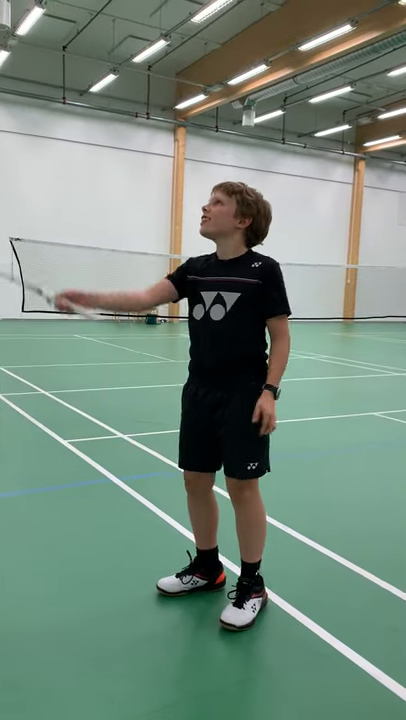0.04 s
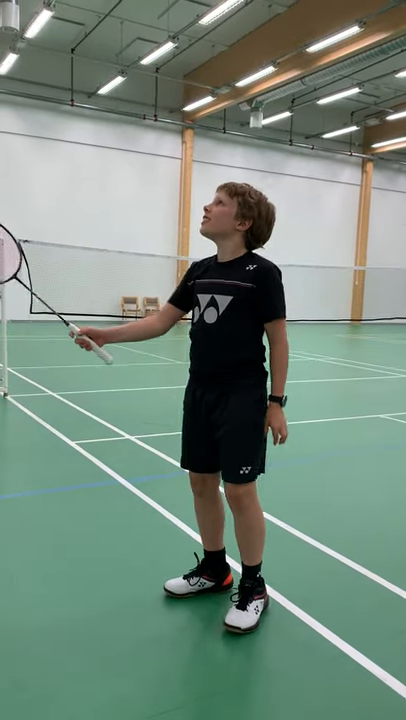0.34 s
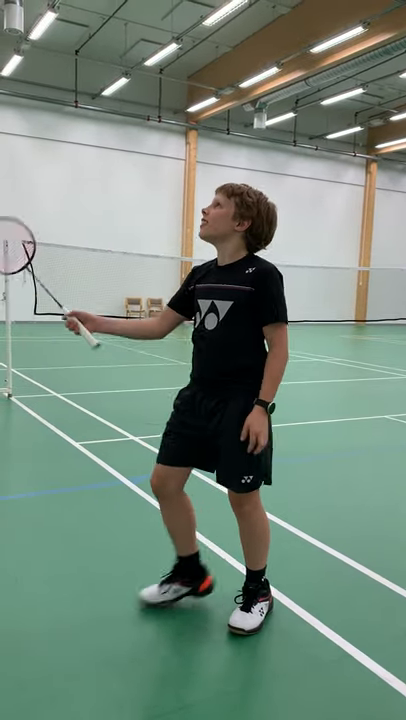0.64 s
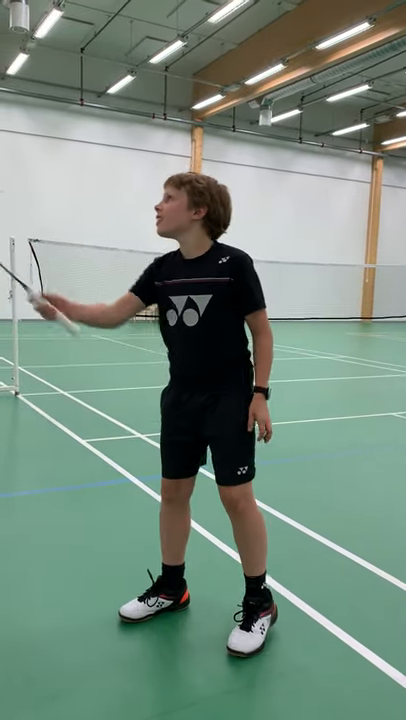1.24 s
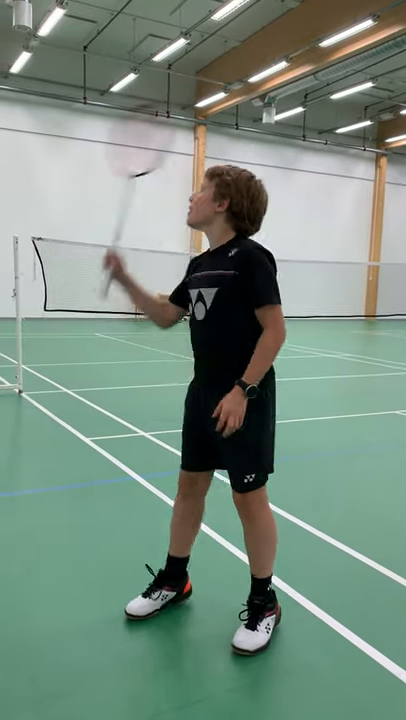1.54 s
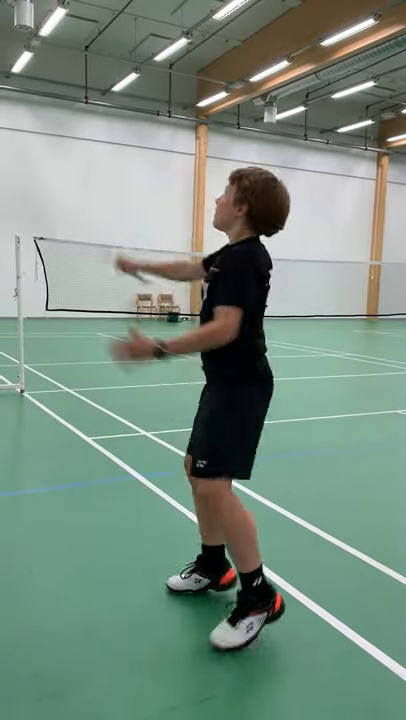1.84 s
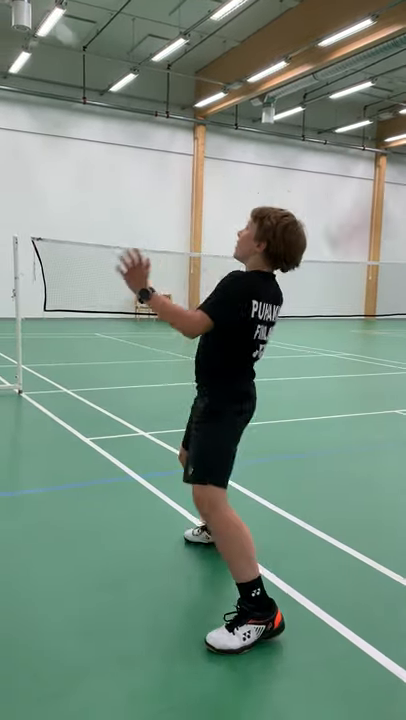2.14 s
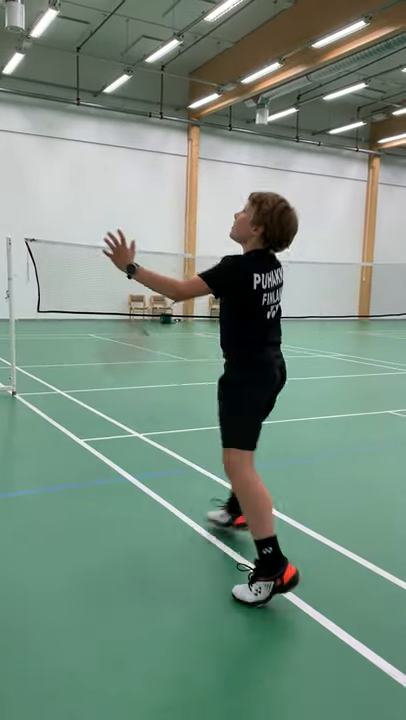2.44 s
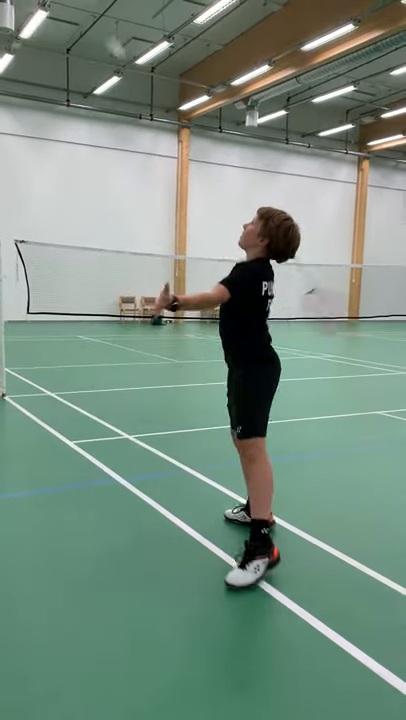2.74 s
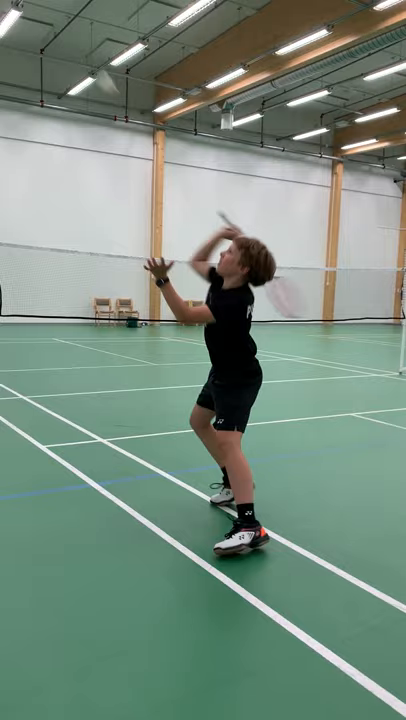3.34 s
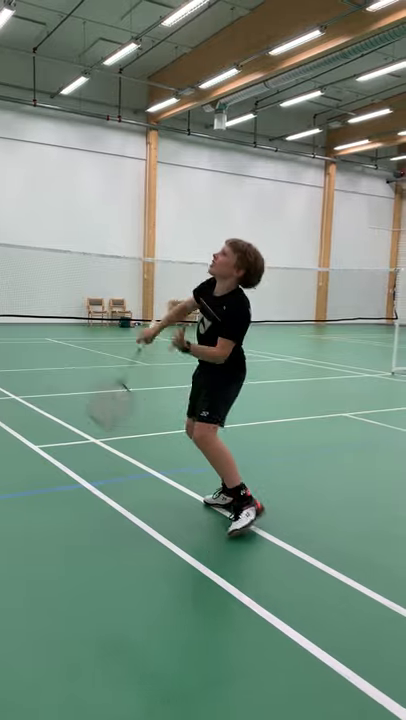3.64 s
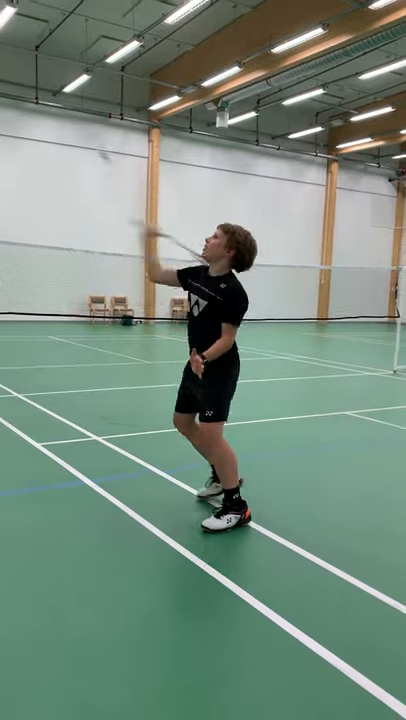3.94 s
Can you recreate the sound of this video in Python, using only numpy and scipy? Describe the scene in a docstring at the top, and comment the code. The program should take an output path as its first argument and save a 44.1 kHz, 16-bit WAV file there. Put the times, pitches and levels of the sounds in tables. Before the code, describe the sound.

Badminton racket hits a shuttlecock against a wall five times in an echoing hall.

```python
"""Large sports hall: a player drives a shuttlecock against the wall.
Each stroke cracks and rings the strings; about 0.1 s later the cork knocks on the wall panel.
Shoes scuff and thud, swings swish, the racket frame rings at the start, ventilation runs underneath.
The hall reverberates into a microphone pair; a compressor ducks after the hardest knocks."""
import sys
import numpy as np
from scipy import signal
from scipy.fft import rfft, irfft, next_fast_len
from scipy.io import wavfile
from scipy.ndimage import uniform_filter1d

SR = 44100
rng = np.random.default_rng(int(sys.argv[2]) if len(sys.argv) > 2 else 0)


def dump_mix(stems):
    """Bounce the given channels to the path in sys.argv[1] as a 16-bit WAV at rate SR."""
    frames = np.atleast_2d(stems).T  # one column per channel
    limited = np.clip(frames, -1, 1)  # hard clip at full scale
    pcm = np.round(limited * 32767).astype(np.int16)
    wavfile.write(sys.argv[1], SR, pcm)


N = 176400
T = np.arange(SR // 2) / SR  # time axis of one event, s
MID_S = T[-1] / 2

# racket strokes: start_s, crack_db, crack_hold_s, body_db, ring_db, ring_t60_s, lowest_mode_hz,
# overtones_db, thump_hz, thump_db
STROKES = [(1.133, -24, 0.0038, -34.5, -31, 0.13, 1100, 6, 325, -23.5),
           (1.8955, -6.5, 0.0028, -22.5, -22, 0.088, 1130, 4.5, 680, -13.5),
           (2.3928, -10, 0.0023, -17, -12.5, 0.055, 1105, -0.5, 400, -16.5),
           (2.942, -14, 0.0084, -18, -22, 0.042, 1079, 1.5, 1680, -19),
           (3.5162, -15.5, 0.0027, -23, -20.5, 0.048, 1092, 3, 446, -20.5)]
# spectrum of wall boom and footfalls: freq_hz, level_db
THUD_SPECTRUM = [(25, -43), (45, -18), (70, 11.5), (120, 4.5), (300, 3), (700, 1.5), (3000, -38)]


def racket():
    """Feathers crackle on the strings, the cork thumps, the skirt flutters as it leaves."""
    # spectra: freq_hz, level_db
    crack_spectrum = [(300, -40.5), (1500, -1.5), (2800, 1), (4000, 2.5), (5500, 3), (9000, 1), (12000, -1),
                      (14500, -5), (16000, 4)]
    sizzle_spectrum = [(1500, -1), (4000, -6), (6500, 3.5), (9000, -20), (12000, -4), (16000, -11)]
    body_spectrum = [(40, -7), (140, 3.5), (300, 7), (480, 4), (700, 9), (950, -8), (1650, 6), (2600, -60),
                     (6000, -43)]
    out = np.zeros(N)
    for start_s, crack_db, hold_s, body_db, *_, thump_hz, thump_db in STROKES:
        crack = crackling(blow(rise_s=0.00096, hold_s=hold_s, fall_s=0.0085), depth_db=2.5, rate_hz=680)
        add(out, start_s, amp(crack_db) * burst(crack, crack_spectrum))
        sizzle = crackling(blow(rise_s=0.004, hold_s=0.02, fall_s=0.019), depth_db=3, rate_hz=470)
        add(out, start_s, amp(crack_db - 17) * burst(sizzle, sizzle_spectrum))
        body = blow(rise_s=0.00063, hold_s=0.00725, fall_s=0.0084)
        add(out, start_s, amp(body_db) * burst(body, body_spectrum))
        add(out, start_s, amp(thump_db) * damped_mode(thump_hz, peak_s=0.006))
    return out


def strings(waver=0.33, jitter=0.016, settle_s=0.049, detune=0.0075, spread_db=1.5, fade_power=3.33):
    """The string bed rings, rough at first; each stroke hits another spot, so the mode levels vary."""
    # string bed overtones: pitch_hz, level_db, t60_ratio
    overtones = [(1715, -13, 0.91), (2140, -8, 1.1), (2182, -5, 0.49), (3290, -8.5, 0.91), (3800, -12, .8),
                 (6540, -17, 0.64)]
    out = np.zeros(N)
    for start_s, _, _, _, ring_db, t60_s, lowest_hz, overtones_db, _, _ in STROKES:
        modes = [(lowest_hz, 0, 1)] + [(hz, db + overtones_db, ratio) for hz, db, ratio in overtones]
        for hz, db, t60_ratio in modes:
            tune, strength = rng.uniform(-1, 1, 2)
            roughness = jitter * np.exp(-T / settle_s) * wander(rate_hz=120)
            pitch_hz = hz * (1 + detune * tune + roughness)
            fade_db = 60 * (T / (t60_s * t60_ratio)) ** fade_power  # steepens as the racket swings away
            envelope = amp(ring_db + db + spread_db * strength - fade_db) * (1 - np.exp(-T / 0.0044))
            envelope *= 1 + waver * wander(rate_hz=90)
            add(out, start_s, envelope * np.sin(2 * np.pi * (np.cumsum(pitch_hz) / SR + rng.random())))
    return out


def wall(hiss_rise_s=0.0099):
    """The cork snaps; the panel chirps, knocks and rattles. Returns knocks and their floor bounce."""
    # impacts: snap_s, slap_db, ring_db, clack_db, hollow_db, boom_db, snap_db, floor_delay_s
    impacts = [(0.3788, -33.5, -36, -26, -23, -36.5, -38, 0.0053),
               (1.2442, -21.5, -18.5, -13.5, -15, -30.5, -14, 0.004),
               (1.9599, -19.5, 3, -9, -7.5, -37, 1, .00404),
               (2.4738, -18.5, 1.5, -7, -13.5, -32, -5, 0.004),
               (3.0437, -16.5, -2, -12.5, -24, -36.5, -5, .00426),
               (3.605, -18.5, -2, -8, -8.5, -30, -3.5, 0.0044)]
    # hollow panel modes: pitch_hz, level_db, peak_s
    panel_modes = [(189, -13.5, 0.00721), (292, -4.5, 0.00586), (518, -1.5, 0.003595), (530, -14, 0.00813),
                   (762, -3.5, 0.003365)]
    # spectra: freq_hz, level_db
    hiss_spectrum = [(300, -34), (1200, -15), (2600, -11), (3600, -19.5), (6000, -27), (16000, -59)]
    ring_spectrum = [(1500, -34), (2100, -8), (2550, -1), (2850, -6), (3200, -14.5), (4200, -20.5),
                     (6000, -53)]
    clack_spectrum = [(600, -43), (950, -6.5), (1200, -2), (1700, -2), (2100, -7), (2800, -42)]
    snap_spectrum = [(2000, 3.5), (4000, -7), (7500, -5.5), (11000, -10.5), (16000, -14)]
    slap_spectrum = [(60, -25), (250, -6.5), (600, -1.5), (1300, 6), (2500, 4), (3300, 1.5), (4200, -5),
                     (5200, -5), (8000, -22.5), (12000, -23.5), (16000, -26)]
    # floor reflection: freq_hz, gain_db
    floor_gain = [(200, 0), (700, 2.5), (1600, -0.5), (2600, -8.5), (6000, -1.5), (16000, 1.5)]
    knocks, bounce = np.zeros(N), np.zeros(N)
    for snap_s, slap_db, ring_db, clack_db, hollow_db, boom_db, snap_db, floor_delay_s in impacts:
        # a faint hiss swells and fades around each knock
        knock_hiss = np.exp(-abs(T - MID_S) / hiss_rise_s) * burst(np.ones(len(T)), hiss_spectrum)
        knock = amp(ring_db) * (bending_chirp(ring_spectrum) + amp(-20) * knock_hiss)
        knock += amp(clack_db) * bending_chirp(clack_spectrum)
        snap = blow(rise_s=0.00006, hold_s=0.000558, fall_s=0.00028)
        add(knock, MID_S, amp(snap_db) * burst(snap, snap_spectrum))
        slap = blow(rise_s=0.00098, hold_s=0.0058, fall_s=0.0052)
        add(knock, MID_S - 0.0015, amp(slap_db) * burst(slap, slap_spectrum))
        hollow = sum(amp(db) * damped_mode(hz, peak_s) for hz, db, peak_s in panel_modes)
        add(knock, MID_S - 0.0008, amp(hollow_db) * hollow)
        boom = blow(rise_s=0.0079, hold_s=0.021, fall_s=0.03)
        add(knock, MID_S + 0.012, amp(boom_db) * burst(boom, THUD_SPECTRUM))
        rattle = crackling(blow(rise_s=0.00042, hold_s=0.005, fall_s=0.0032), depth_db=4.5, rate_hz=180)
        add(knock, MID_S - 0.002, amp(ring_db - 11) * burst(rattle, ring_spectrum))
        add(knocks, snap_s - MID_S, knock)
        floor = lambda hz: amp(lookup(floor_gain, hz)) * np.exp(-2j * np.pi * hz * floor_delay_s)
        add(bounce, snap_s - MID_S, filtered(knock, floor))
    return knocks, bounce


def bending_chirp(spectrum):
    """High bending waves outrun low ones in the wall: a falling chirp around MID_S, peak 1."""
    # arrival relative to the snap: freq_hz, delay_s
    arrival = [(500, .003), (1100, .0022), (1700, .0013), (2200, 0), (2600, -.0013), (3200, -.0026),
               (4500, -.001)]
    hz = np.fft.rfftfreq(len(T), 1 / SR)
    phase = 2 * np.pi * np.cumsum(lookup(arrival, hz)) * hz[1]
    pulse = np.fft.fftshift(irfft(amp(lookup(spectrum, hz)) * np.exp(-1j * phase), len(T)))
    return pulse / abs(pulse).max()


def player():
    """Shoes scuff and thud; racket and sleeve swish through the air."""
    # shoe scuffs: start_s, length_s, level_db
    scuffs = [(0.772, 0.027, -38.5), (1.77, 0.032, -48.5), (2.165, 0.0024, -31)]
    # footfalls: start_s, level_db
    steps = [(1.487, -55), (2.132, -39), (2.41, -26.5), (2.66, -38), (2.748, -49), (2.95, -31.5),
             (3.202, -38.5), (3.54, -37.5), (3.882, -45)]
    # swings: peak_s, rise_s, level_db
    swishes = [(1.135, 0.0058, -38), (1.899, 0.013, -30), (2.341, 0.041, -42), (2.801, 0.03, -49),
               (2.903, 0.14, -39.5), (3.387, 0.027, -47), (3.511, 0.053, -45.5)]
    # spectra: freq_hz, level_db
    scuff_spectrum = [(200, 1), (900, -3), (2500, -16), (4000, -9), (6000, -5), (8500, -11.5),
                      (11000, -15.5), (16000, -20)]
    swish_spectrum = [(200, -21), (1500, 12), (4000, 7), (6500, 2.5), (9000, -6), (12000, -6), (16000, -12)]
    out = np.zeros(N)
    for start_s, length_s, db in scuffs:
        scuff = blow(rise_s=0.00098, hold_s=length_s / 2, fall_s=length_s * 0.55)
        add(out, start_s, amp(db) * burst(scuff, scuff_spectrum))
    for start_s, db in steps:
        step = blow(rise_s=0.0055, hold_s=0.0415, fall_s=0.012)
        add(out, start_s, amp(db) * burst(step, THUD_SPECTRUM))
    for peak_s, rise_s, db in swishes:
        swell = np.exp(-((T - MID_S) / rise_s) ** 2)
        add(out, peak_s - MID_S, amp(db) * swell * burst(np.ones(len(T)), swish_spectrum))
    return out


def frame_ring():
    """The racket still rings from a touch on its frame."""
    # frame modes: pitch_hz, level_db, t60_s
    modes = [(1076, -46.5, 0.73), (2430, -49, 0.93), (3155, -54.5, 0.78), (3770, -53, 0.67),
             (4527, -60, 0.98), (5250, -43, 0.19), (5938, -54.5, 0.48)]
    t = np.arange(N) / SR
    return sum(amp(db - 60 * t / t60_s) * np.sin(2 * np.pi * hz * t) for hz, db, t60_s in modes)


def hall(x, early_s=0.031, early_width_s=0.012, build_s=0.0022, far_s=0.25, far_width_s=0.065, far_db=2):
    """Near surfaces answer first; the long tail swells as the far wall returns the sound."""
    # reverberation time: freq_hz, t60_s
    decay = [(80, 6.5), (300, 5), (1000, 2.5), (2200, 2.0), (4000, 1.6), (6500, 1), (10000, 0.62),
             (15000, 0.42)]
    # tail and early reflections: freq_hz, gain_db
    tail_gain = [(60, -6), (170, -4.5), (350, -2.5), (600, -7.5), (1200, -2), (2500, -8.5), (4000, -9),
                 (6500, -12), (10000, -14), (13000, -12.5), (16000, -15)]
    early_gain = [(80, -9.5), (300, -8.5), (1000, -10), (2500, -4), (6000, -18.5), (15000, -25)]
    t = np.arange(2 * SR) / SR
    hz, frame_s, bands = signal.stft(rng.standard_normal((2, len(t))), SR, nperseg=256)
    t60_s = lookup(decay, hz)[:, None]
    bands = bands * amp(-60 * frame_s / t60_s) / np.sqrt(t60_s * SR / np.log(1e6))  # equal energy
    tail = signal.istft(bands, SR, nperseg=256)[1][:, :len(t)]
    tail *= (1 - np.exp(-t / build_s)) * amp(far_db * np.exp(-((t - far_s) / far_width_s) ** 2))
    early = rng.standard_normal((2, len(t))) * np.exp(-((t - early_s) / early_width_s) ** 2 / 2)
    response = coloured(tail, tail_gain) + coloured(early / np.linalg.norm(early[0]), early_gain)
    return signal.fftconvolve(x[None], diffuse(response), axes=1)[:, :N]


def moving_echoes(x, paths=4):
    """Player and shuttlecock move, so each half second takes the next of several hall responses."""
    path = (np.arange(N) // (SR // 2)) % paths
    return sum(hall(x * (path == k)) for k in range(paths))


def background(air_db=-50.5, echo_db=-42, echo_fall_db_per_s=60):
    """Ventilation, and the dying echo of an earlier stroke."""
    # spectra: freq_hz, level_db
    air_spectrum = [(20, -29), (35, 0), (60, 5), (110, 4), (200, 4.5), (350, 1.5), (600, -3.5),
                    (1200, -10.5), (2500, -17), (5000, -36), (9000, -46), (16000, -41)]
    echo_spectrum = [(60, -15), (330, 2), (600, -7), (1100, -13.5), (2000, -12), (3200, -15),
                     (6500, -20.5), (9000, -37.5), (16000, -42)]
    air = unit_rms(coloured(rng.standard_normal((2, N)), air_spectrum))
    echo = unit_rms(coloured(rng.standard_normal((2, N)), echo_spectrum))
    return diffuse(amp(air_db) * air + amp(echo_db - echo_fall_db_per_s * np.arange(N) / SR) * echo)


def direct(x, lag_s):
    """Below the treble, the left microphone hears the source slightly later."""
    left = filtered(x, lambda hz: np.exp(-2j * np.pi * hz * lag_s * np.exp(-(hz / 1700) ** 2)))
    return np.array([left, x])


def diffuse(pair):
    """Makes two unrelated signals as alike as diffuse sound is at the microphones."""
    # microphone pair: freq_hz, coherence
    coherence = [(60, 1), (200, 0.97), (380, 0.56), (650, 0.066), (1500, 0.031), (2500, 0.85), (3500, 0.61),
                 (5000, 1), (15000, 1)]
    mid = filtered(pair[0], lambda hz: np.sqrt((1 + lookup(coherence, hz)) / 2))
    side = filtered(pair[1], lambda hz: np.sqrt((1 - lookup(coherence, hz)) / 2))
    return np.array([mid + side, mid - side])


def damped_mode(hz, peak_s, swell=6.9):
    """A heavily damped mode that swells and dies within milliseconds."""
    return (T / peak_s * np.exp(1 - T / peak_s)) ** swell * np.sin(2 * np.pi * hz * (T - peak_s))


def burst(envelope, spectrum):
    """Dense, even noise with the given envelope and spectral shape, at the envelope's rms."""
    n = len(envelope)
    noise = rng.standard_normal(n)
    for _ in range(3):  # flatten spectrum and level in turn
        noise = irfft(np.exp(1j * np.angle(rfft(noise * envelope))), n)
        noise /= np.sqrt(abs(uniform_filter1d(noise ** 2, size=64)) + 1e-14)
    return unit_rms(coloured(noise * envelope, spectrum)) * np.sqrt(np.mean(envelope ** 2))


def blow(rise_s, hold_s, fall_s):
    """Envelope: attack, hold, exponential release."""
    return (1 - np.exp(-T / rise_s)) * np.exp(-np.maximum(T - hold_s, 0) / fall_s)


def crackling(envelope, depth_db, rate_hz):
    """Breaks an envelope into uneven ticks of the same total energy."""
    uneven = envelope * amp(depth_db * wander(rate_hz))
    return uneven * np.linalg.norm(envelope) / np.linalg.norm(uneven)


def wander(rate_hz):
    """Smooth random curve, rms 1."""
    return unit_rms(filtered(rng.standard_normal(len(T)), lambda hz: np.exp(-(hz / rate_hz) ** 2)))


def filtered(x, gain):
    """Applies a gain given as a function of frequency."""
    size = next_fast_len(x.shape[-1] + 4096)
    return irfft(rfft(x, size) * gain(np.fft.rfftfreq(size, 1 / SR)), size)[..., :x.shape[-1]]


def coloured(x, spectrum):
    """Filters by a table of freq_hz, gain_db."""
    return filtered(x, lambda hz: amp(lookup(spectrum, hz)))


def lookup(table, hz):
    """Interpolates on a log-frequency axis."""
    freq_hz, value = np.transpose(table)
    return np.interp(np.log(hz + 1), np.log(freq_hz + 1), value)


def add(mix, start_s, sound):
    part = mix[max(round(start_s * SR), 0):][:len(sound)]
    part += sound[:len(part)]


def amp(db):
    return 10 ** (np.asarray(db) / 20)


def unit_rms(x):
    return x / np.sqrt(np.mean(x ** 2) + 1e-20)


def scene():
    """Direct sound, hall and background, heard through two microphone ports."""
    # send to the hall: source, gain_db
    send_db = dict(stroke=4, strings=-6.5, player=-5, wall=2.5)
    # phase between the ports: freq_hz, left_lead_rad
    port_phase = [(0, 0), (350, .05), (1600, 1.1), (2500, 2.6), (3000, 2.1), (3700, 1.8), (4600, 3.1),
                  (6400, 6), (7200, 6.45), (8900, 9.4), (10600, 12.3), (11500, 12.7), (13100, 15.7),
                  (15000, 18.8), (16000, 19)]
    strokes, ring, (knocks, bounce), moves = racket(), strings(), wall(), player()
    near = direct(strokes + ring + moves + frame_ring(), lag_s=0.00042)
    near += direct(knocks + bounce, lag_s=0.00048)
    send = (amp(send_db["stroke"]) * strokes + amp(send_db["strings"]) * ring
            + amp(send_db["player"]) * moves + amp(send_db["wall"]) * knocks)
    left, right = (near + moving_echoes(send) + background()) * signal.windows.tukey(N, 0.002)
    right = filtered(right, lambda hz: np.exp(-1j * np.interp(hz, *np.transpose(port_phase))))
    return np.array([left, right])


def record(dry, threshold_db=-9, squeeze=0.61, attack_s=0.0061, recover_db_per_s=35, ceiling=0.9,
           low_hz=44, high_hz=16000):
    """A compressor ducks just after each peak and recovers slowly; then soft overload and band limits."""
    level_db = 20 * np.log10(abs(dry).max(0) + 1e-9)
    cut_db = squeeze * np.maximum(level_db - threshold_db, 0)
    recovery_db = np.arange(N) / SR * recover_db_per_s
    held_db = np.maximum.accumulate(cut_db + recovery_db) - recovery_db
    pole = np.exp(-1 / (attack_s * SR))
    ducked = dry / amp(signal.lfilter([1 - pole], [1, -pole], held_db))
    clipped = ducked / (1 + (ducked / ceiling) ** 8) ** (1 / 8)
    highpass = signal.butter(3, low_hz, "high", fs=SR, output="sos")
    lowpass = signal.firwin(255, high_hz, window=("kaiser", 8), fs=SR)
    return signal.oaconvolve(signal.sosfilt(highpass, clipped), lowpass[None], "same")


dry = scene()
out = record(dry)
dump_mix(out)
```